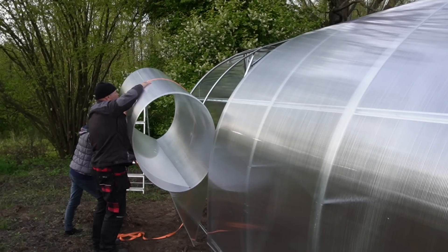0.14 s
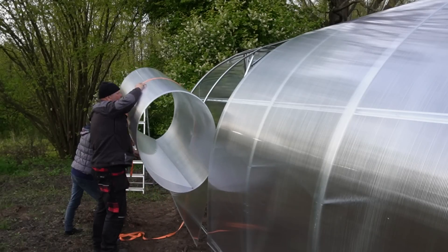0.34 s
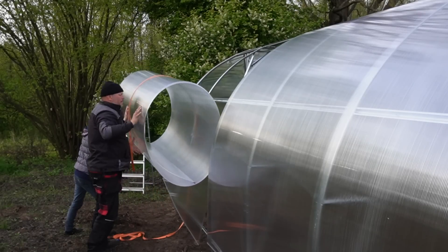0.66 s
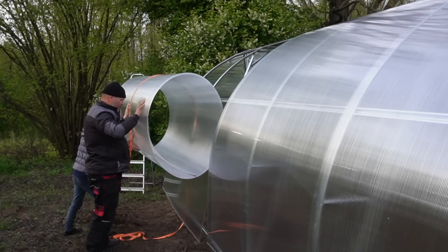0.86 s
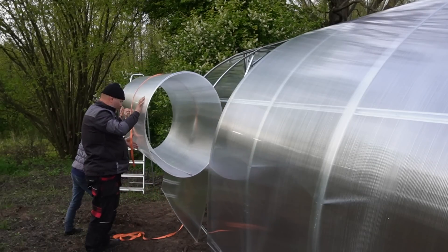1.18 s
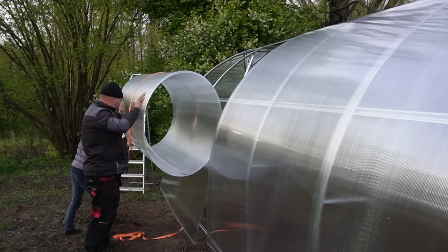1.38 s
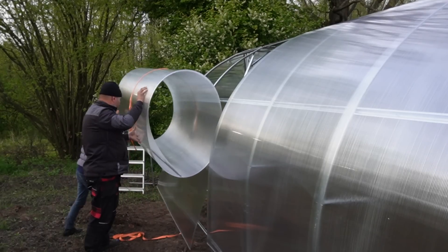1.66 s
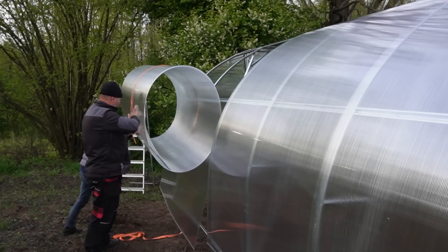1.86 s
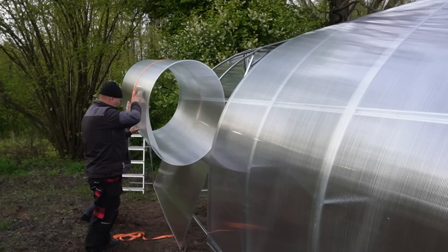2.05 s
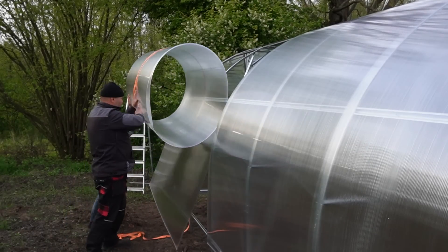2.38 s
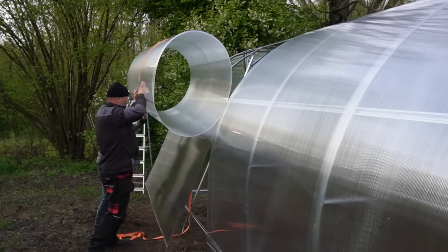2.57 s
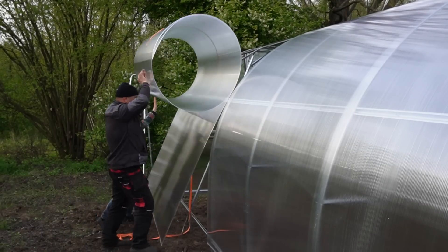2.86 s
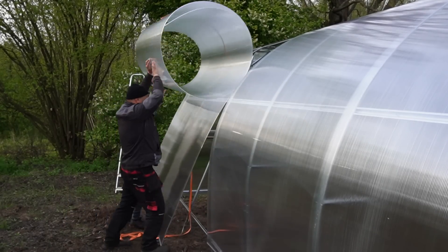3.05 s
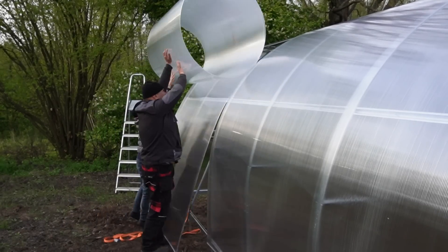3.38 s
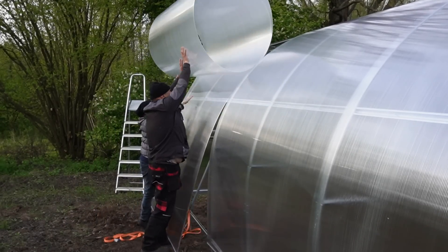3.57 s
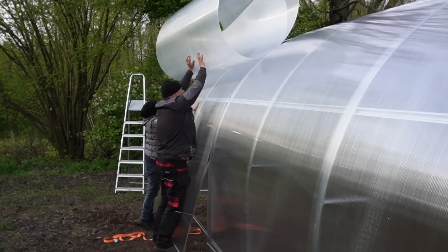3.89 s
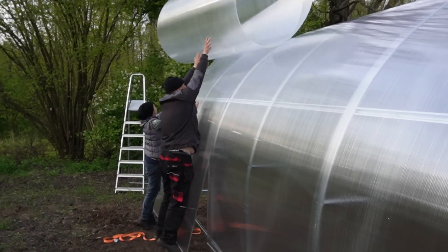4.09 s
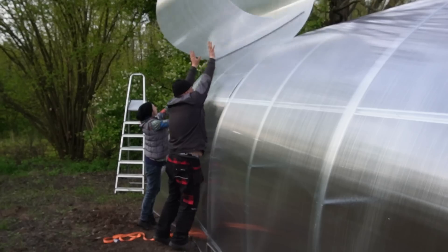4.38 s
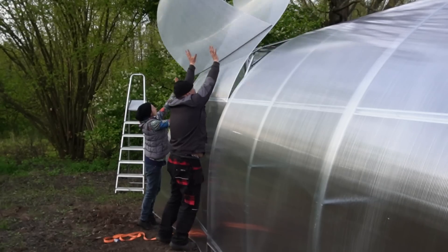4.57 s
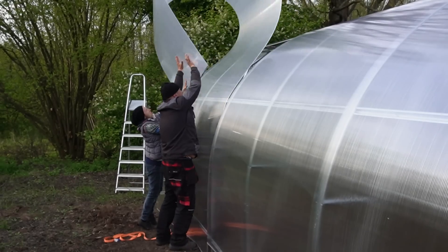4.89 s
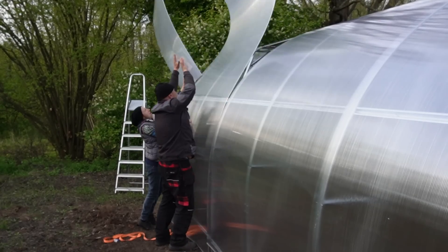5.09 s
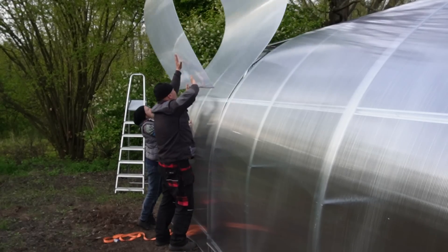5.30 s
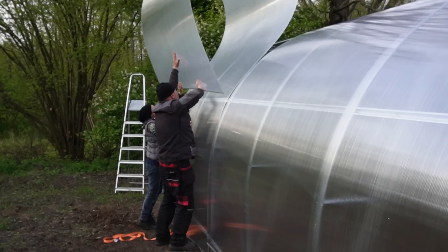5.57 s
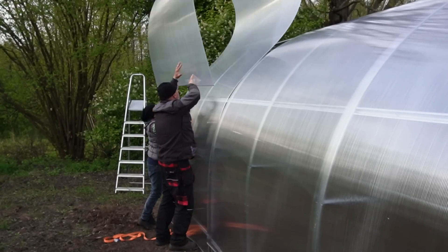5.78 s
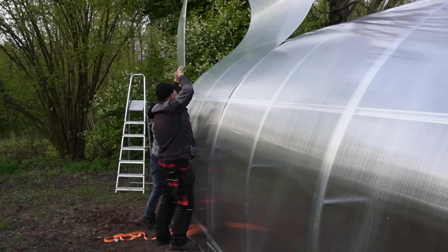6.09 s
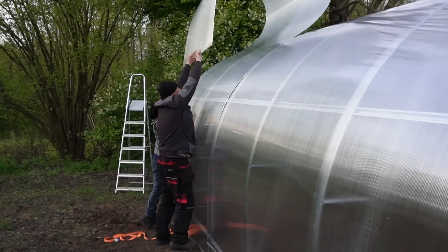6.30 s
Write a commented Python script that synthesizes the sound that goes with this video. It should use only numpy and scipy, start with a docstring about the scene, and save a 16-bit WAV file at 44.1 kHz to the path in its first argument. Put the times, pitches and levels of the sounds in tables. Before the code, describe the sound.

Outdoors, a little way from the microphone, a hollow plastic panel crackles and pops as it is bent, the sounds quick and clipped. The snaps give way to swishing slides, then a loud, brief squeak as the sheet rubs on the frame. After a couple more cracks the panel flexes with dull booms and thumps, growing much quieter, with scattered ticks over very faint garden air.

```python
"""Plastic sheet rolled over a greenhouse frame

Two people handle a stiff hollow sheet outdoors, some metres away. It buckles in snaps over a rustle,
booms and thumps as it wobbles, chirps and squeaks on the frame. A faint hum stands in the garden air.
The scene runs sped up: time skips ahead every 40 ms, cutting rings short."""
import sys
import numpy as np
from scipy import signal
from scipy.io import wavfile
from scipy.ndimage import uniform_filter1d

SR = 44100
rng = np.random.default_rng(int(sys.argv[2]) if len(sys.argv) > 2 else 0)


def persist_wave(psi):
    """Save psi, clipped to +-1, as 16-bit WAV."""
    counts = np.round(np.clip(psi, -1, 1) * 32767).astype(np.int16)
    wavfile.write(sys.argv[1], SR, np.atleast_2d(counts).T)


N = 284445
PIECE_S, FIRST_SKIP_S = 0.04, 0.032

# buckling snaps: t/s, crack level/dB, body level/dB, ring t60/s
SNAPS = [(0.0487, -36, -35, 0.2), (0.147, -32, -31.5, 0.29), (0.3058, -22, -20.5, 0.24),
         (0.607, -15, -13.5, 0.17), (0.634, -23.5, -31, 0.27), (0.6867, -27, -32, 0.1),
         (0.7865, -25.5, -30.5, 0.63), (0.826, -22, -10, 0.058), (0.942, -22, -16.5, 0.29),
         (0.953, -16, -10.5, 0.16), (1.033, -15.5, -12.5, 0.23), (1.065, -15.5, -15, 0.39),
         (1.082, -26, -18, 0.26), (1.1072, -20, -36, 0.2), (1.126, -26, -16, 0.073),
         (1.2021, -16, -20.5, 0.16), (1.235, -27.5, -30, 0.44), (1.3054, -21.5, -22.5, 0.46),
         (1.3229, -19, -15.5, 0.39), (1.474, -33, -16.5, 0.21), (1.51, -21, -14, 0.11),
         (1.539, -8, -10, 0.27), (1.9091, -22.5, -21, 1), (1.974, -15.5, -20, 0.31),
         (1.991, -22, -13, 0.37), (2.03, -13.5, -17, 0.23), (2.0543, -11.5, -19, 0.33),
         (2.1175, -14.5, -21, 0.16), (2.1887, -13, -18, 0.19), (2.216, -22.5, -19.5, 0.86),
         (2.2836, -20, -10.5, 0.087), (2.4061, -27, -36, 1), (3.5235, -28, -31.5, 0.37),
         (3.6505, -23, -24, 0.4), (3.863, -14, -18, 0.22), (3.87, -13, -16.5, 0.12),
         (4.1128, -29, -32.5, 0.17), (4.225, -29, -29.5, 0.31), (4.4034, -48, -32.5, 0.88),
         (4.717, -35, -33.5, 0.096), (4.775, -33, -53, 0.5), (4.9335, -38.5, -33, 0.19),
         (5.159, -43.5, -31.5, 0.24), (6.32, -43.5, -42.5, 0.23)]
# panel flips, booming until held again: t/s, length/s, level/dB
BOOMS = [(1.313, .4, -50), (3.067, .08, -30), (3.877, .04, -26.5), (4.23, .16, -35.5), (4.392, .28, -30.5),
         (4.712, .2, -34.5), (4.91, .24, -36.5), (6.3, .12, -42.5)]


def amp(db):
    return 10 ** (np.asarray(db) / 20)


def unit_rms(x):
    return x / np.sqrt(np.mean(x ** 2) + 1e-20)


def colour(x, points):
    """Minimum-phase filter through points of f/Hz, gain/dB."""
    f, db = np.transpose(points)
    hz = abs(np.fft.fftfreq(4096, 1 / SR))
    log_gain = np.log(amp(np.maximum(np.interp(np.log(hz + 1), np.log(f), db), -100)))
    taps = np.fft.ifft(np.exp(np.conj(signal.hilbert(log_gain)))).real
    return signal.oaconvolve(x, taps[:2048])[:len(x)]


def ring(x, modes):
    """Sum of two-pole resonances: f/Hz, width/Hz, gain/dB."""
    return sum(amp(db) * signal.lfilter(*signal.iirpeak(hz, hz / width, SR), x)
               for hz, width, db in modes)


def shaped(envelope, drive, shape):
    """Enveloped drive through a filter scaled to keep the envelope's level."""
    return shape(envelope * drive) / np.std(shape(drive))


def skips(t):
    """Count of time skips up to t."""
    return np.floor((t - FIRST_SKIP_S) / PIECE_S).astype(int) + 1


def skipping_noise(shape, speed=1):
    """Filtered unit noise, read at a given speed, jumping one piece ahead at each skip."""
    position = np.cumsum(speed * np.ones(N)) + skips(np.arange(N) / SR) * round(PIECE_S * SR)
    return unit_rms(np.interp(position, np.arange(3 * N), shape(rng.standard_normal(3 * N))))


def air():
    """Garden air at unit level."""
    # air spectrum: f/Hz, density/dB
    spectrum = [(25, -2.5), (407, -8), (620, 2), (874, -19), (7970, -20.5), (10900, -25), (13500, -39)]
    return skipping_noise(lambda x: colour(x, spectrum))


def hum(hz=626, level_db=-63.5):
    """Faint tone; phase and level jump at each skip."""
    t = np.arange(N) / SR
    tone = np.sqrt(2) * np.sin(2 * np.pi * (hz * t + rng.random(200)[skips(t)]))
    return tone * amp(level_db + 1.7 * rng.standard_normal(200)[skips(t)])


def handling(jump_share=0.8, boom_fade_db_per_s=32):
    """Rustle, hiss and wobble gains: strokes and booms over steady handling, stepping at each skip."""
    # steady handling: t/s, rustle/dB, hiss/dB, wobble/dB
    steady = [(0.0, -46, -51, -58), (0.3, -49.5, -49, -68), (0.6, -46, -44.5, -54.5), (1.3, -43, -44, -59),
              (1.8, -40.5, -42, -63), (2.4, -50, -38, -51), (2.65, -50, -51.5, -59.5),
              (3.1, -43, -45.5, -49), (3.548, -47, -48.5, -49), (4.1, -45.5, -50, -44.5),
              (4.69, -58, -50.5, -50), (5.2, -47, -67.5, -38.5), (5.3, -63, -68, -46),
              (5.7, -66, -70.5, -59.5), (6.45, -62.5, -66, -63)]
    # sheet sliding on sheet or frame: t/s, length/s, rustle/dB, hiss/dB
    strokes = [(1.326, 0.39, -30.5, -32), (1.88, 0.22, -34, -35.5), (2.188, 0.092, -37, -32.5),
               (2.412, 0.066, -29, -36.5), (2.519, 0.078, -42, -36.5), (2.72, 0.075, -33.5, -37),
               (2.879, 0.092, -37, -40.5), (3.028, 0.05, -36.5, -36), (3.222, 0.28, -34, -51),
               (3.633, 0.11, -34.5, -43), (3.755, .24, -38, -38.5), (4.239, 0.42, -44.5, -47.5),
               (4.389, 0.048, -29, -53), (4.812, 0.3, -47.5, -76), (5.793, 0.26, -84, -67.5),
               (6.33, 0.094, -45.5, -60.5)]
    piece = skips(np.arange(N) / SR)
    t = FIRST_SKIP_S + PIECE_S * (np.arange(piece[-1] + 1) - .5)  # piece centres
    steady_s, *steady_db = np.transpose(steady)
    rub, hiss, flex = (amp(2 * np.interp(t, steady_s, db)) for db in steady_db)  # powers
    start_s, length_s, rub_db, hiss_db = np.transpose(strokes)
    from_s = np.maximum(start_s, t[:, None] - PIECE_S / 2)
    to_s = np.minimum(start_s + length_s, t[:, None] + PIECE_S / 2)
    overlap = np.clip((to_s - from_s) / PIECE_S, 0, 1)
    rub += overlap @ amp(2 * rub_db)
    hiss += overlap @ amp(2 * hiss_db)
    flip_s, free_s, boom_db = np.transpose(BOOMS)
    age_s = t[:, None] - flip_s
    booming = (age_s > 0) * (age_s < free_s)
    flex += (booming * amp(2 * (boom_db - boom_fade_db_per_s * age_s.clip(0)))).sum(1)
    gains = []
    for power in rub, hiss, flex:
        db = (10 * np.log10(power) + 1.2 * rng.standard_normal(200)[:len(t)])[piece]
        stepped_db, smooth_db = uniform_filter1d(db, 60), uniform_filter1d(db, 2400)
        gains.append(amp(jump_share * stepped_db + (1 - jump_share) * smooth_db))
    return gains


def chirps():
    """Sheet sliding on the frame: brief noise in one narrow resonance."""
    # slides: t/s, length/s, f/Hz, level/dB
    slides = [(3.662, 0.043, 1584, -29.5), (3.851, 0.028, 2100, -31.5), (3.955, 0.031, 1234, -32.5),
              (4.104, 0.067, 906, -42), (5.09, 0.033, 3410, -47)]
    out = np.zeros(N)
    for s, length_s, hz, db in slides:
        band = ring(rng.standard_normal(6000), [(hz, 0.027 * hz, 0)])
        tone = unit_rms(band[2000:][:round(length_s * SR)])
        out[round(s * SR):][:len(tone)] += amp(db) * tone * signal.windows.tukey(len(tone), .5)
    return out


def wobble(flex, taut_ratio=1.15, slacken_per_s=1.6):
    """The flexing panel booms; its modes start high at each flip and sink."""
    # slow bending modes: f/Hz, width/Hz, gain/dB
    modes = [(72.6, 42, 3), (154, 140, 2.5), (218, 90, 1), (400, 50, -8)]
    t, flip_s = np.arange(N) / SR, np.transpose(BOOMS)[0]
    age_s = t - flip_s[np.maximum(np.searchsorted(flip_s, t) - 1, 0)]
    pitch_ratio = taut_ratio * np.exp(-slacken_per_s * age_s.clip(0, .3))
    return flex * skipping_noise(lambda x: ring(ring(x, modes), modes), pitch_ratio)


def thumps(rise_s=0.0099, t60_s=0.4, sag_per_s=4.37):
    """A soft push on the panel: one low note that sags as it dies."""
    # panel thumps: t/s, f/Hz, level/dB
    pushes = [(4.435, 187.5, -24), (4.719, 258, -29), (4.785, 202.3, -26), (6.016, 252, -48),
              (6.181, 247, -43.5)]
    t, out = np.arange(SR // 4) / SR, np.zeros(N + SR)
    for s, hz, db in pushes:
        note = np.sin(2 * np.pi * np.cumsum(hz * np.exp(-sag_per_s * t)) / SR)
        out[round(s * SR):][:len(t)] += amp(db - 60 * t / t60_s) * (1 - np.exp(-t / rise_s)) * note
    return out[:N]


def creases(hiss, rate_per_s=130, t60_s=0.014):
    """Tiny creases, each a broad tick with a high ping; most are random and scale with the hiss."""
    # loudest creases: t/s, level/dB
    loudest = [(.217, -30), (1.796, -21), (2.432, -21), (2.501, -36), (2.54, -29), (4.486, -24.5),
               (4.726, -30), (4.741, -28.5), (4.767, -29), (4.802, -28.5)]
    # tick pitches (the ring near 8.4 kHz is probably the microphone's): f/Hz
    pings_hz = [4200, 6600, 8350, 8700]
    hits = hiss * (rng.random(N) < rate_per_s / SR)
    hits *= amp(1.5 + 2.9 * np.minimum(rng.exponential(1, N), 3))
    for s, db in loudest:
        hits[round(s * SR)] = amp(db)
    which = rng.integers(0, len(pings_hz), N)
    t, out = np.arange(400) / SR, np.zeros(N)
    for k, hz in enumerate(pings_hz):
        burst = amp(-60 * t / t60_s) * rng.standard_normal(len(t))
        tick = 0.13 * np.diff(burst) + 2.3 * ring(burst, [(hz, 1500, 0)])[1:]
        out += signal.oaconvolve(hits * (which == k), tick)[:N]
    return out


def squeak(end_s=3.672, release_db_per_s=150):
    """Stick-slip on the frame: ten wavering harmonics and a rasp, gliding between time skips."""
    # squeak track: t/s, f/Hz, fundamental/dB, octave/dB, upper partials/dB, rasp/dB
    track = [(3.192, 833.6, -21.5, -20.5, -34, -35.5), (3.245, 833.3, -14.5, -17, -27.5, -25),
             (3.29, 829.7, -14.5, -29, -24.5, -30.5), (3.325, 843.7, -9, -25.5, -28, -25.5),
             (3.365, 835.5, -12.5, -19, -24.5, -21), (3.402, 825.3, -11, -26, -38.5, -28.5),
             (3.422, 828, -20.5, -27, -40.5, -32.5), (3.455, 839, -13.5, -37, -39.5, -35),
             (3.472, 826, -30.5, -39, -45.5, -46)]
    # time skips where the squeak's level steps: t/s
    level_skips_s = [3.232, 3.472]
    clicks_s = [3.232, 3.312, 3.352, 3.392, 3.472]  # phase jumps at time skips
    row_s, *columns = np.transpose(track)
    t = np.arange(row_s[0], end_s, 1 / SR)
    part = np.searchsorted(level_skips_s, t, "right")
    row_part = np.searchsorted(level_skips_s, row_s + .002)
    hz, first_db, octave_db, upper_db, rasp_db = (
        np.choose(part, [np.interp(t, row_s[row_part == p], column[row_part == p]) for p in range(3)])
        for column in columns)
    turns = np.cumsum(hz) / SR + 0.407 * uniform_filter1d(1. * np.searchsorted(clicks_s, t), 20)
    partials_db = [first_db, octave_db, upper_db + 1.8] + [upper_db - 4.6 * k for k in range(7)]
    drift = uniform_filter1d(uniform_filter1d(rng.standard_normal((2, 10, len(t))), 300), 300)
    tone = np.zeros(len(t))
    for k, db in enumerate(partials_db):
        loose = min(0.06 + 0.16 * k, 0.75)  # higher partials waver more
        waver = (unit_rms(drift[0, k]) + 1j * unit_rms(drift[1, k])) / np.sqrt(2)
        phasor = np.exp(2j * np.pi * ((k + 1) * turns + rng.random()))
        tone += amp(db) * ((np.sqrt(1 - loose ** 2) + loose * waver) * phasor).real
    grit = [(3130, 4300, 0)]
    rasp = amp(rasp_db) * unit_rms(ring(ring(rng.standard_normal(len(t)), grit), grit))
    release = amp(-release_db_per_s * (t - level_skips_s[-1]).clip(0))
    out = np.zeros(N)
    out[round(row_s[0] * SR):][:len(t)] = (np.sqrt(2) * tone + rasp) * release
    return out


def crackle(rate_per_s, spread_db, t60_s, floor):
    """Noise that leaps at random tiny slips and decays after each."""
    slips = (rng.random(N) < rate_per_s / SR) * amp(spread_db * np.minimum(rng.exponential(1, N), 4))
    strength = signal.lfilter([1], [1, -amp(-60 / (t60_s * SR))], slips)
    return unit_rms((floor + unit_rms(strength)) * rng.standard_normal(N))


def patchy(x, depth_db):
    """Each moment excites another part of the sheet: the colour drifts in patches."""
    spectrum = signal.stft(x, nperseg=256)[2]
    noise = rng.standard_normal(spectrum.shape)
    patches = unit_rms(uniform_filter1d(uniform_filter1d(noise, 3, axis=0), 9, axis=1))
    return signal.istft(spectrum * amp(depth_db * patches), nperseg=256)[1][:N]


def snap_envelope(levels_db, t60_s, rise_s, delay_s=0, skip_age_s=0.016):
    """Power sum of a quick rise and exponential fall per snap; each skip ages the ring."""
    t, power = np.arange(SR // 2) / SR, np.zeros(N + SR)
    for s, db, ring_s in np.broadcast(np.transpose(SNAPS)[0], levels_db, t60_s):
        age_s = t + skip_age_s * np.maximum(skips(s + t) - skips(s + 0.0057), 0)
        envelope = amp(db - 60 * age_s / max(ring_s, .005)) * (1 - np.exp(-t / rise_s))
        power[round((s + delay_s) * SR):][:len(t)] += envelope ** 2
    return np.sqrt(power[:N])


def sheet(rub, hiss):
    """Rubbing rustles and hisses; buckling gives a click and crack, a knock and a duller ring."""
    # spectra of rubbed sheet, surface hiss, snap front and struck sheet: f/Hz, density/dB
    rustle_eq = [(70, -46), (130, -6), (340, -1), (1200, -4.5), (2500, -8.5), (4500, -15.5), (7000, -38)]
    hiss_eq = [(4000, -6), (6500, -11), (8400, -6.5), (10000, -11.5), (12500, -14.5), (15500, -48)]
    crack_eq = [(500, -33), (1500, 1.5), (3500, 8), (8400, 8.5), (11000, -0.5), (15500, -24)]
    knock_eq = [(100, -29), (190, -1), (340, -3), (1300, 0), (2500, -5), (4500, -11.5), (7000, -36.5)]
    # hollow-sheet resonances: f/Hz, width/Hz, gain/dB
    cells = [(333.7, 37, 1.5), (682, 18, -5.5)]
    _, crack_db, body_db, t60_s = np.transpose(SNAPS)
    rustle = shaped(rub, crackle(370, 1.9, 0.12, floor=0.17), lambda x: colour(x, rustle_eq))

    tail = snap_envelope(body_db - 1.5, t60_s, rise_s=0.0043)
    punch = snap_envelope(body_db - 9, 0.21 * t60_s, rise_s=0.00093)
    impact = snap_envelope(body_db - 0.5, 0.007, rise_s=0.00018, delay_s=0.002)
    push = np.sqrt(tail ** 2 + punch ** 2 + impact ** 2)
    shiver = crackle(500, 2.5, 0.03, floor=0.9)
    knock = shaped(push, shiver, lambda x: colour(x + 1.66 * ring(x, cells), knock_eq))

    scrape = np.hypot(hiss, snap_envelope(crack_db - 11.5, 0.64 * t60_s, rise_s=0.0031))
    fizz = shaped(scrape, crackle(210, 0.72, 0.048, floor=1), lambda x: colour(x, hiss_eq))

    click = snap_envelope(crack_db + 5, 0.005, rise_s=0.0001, delay_s=0.0015)
    front = np.hypot(snap_envelope(crack_db - 9.5, 0.45 * t60_s, rise_s=0.0008), click)
    crack = shaped(front, rng.choice([-1., 1.], N), lambda x: colour(x, crack_eq))
    return rustle + knock + fizz + crack


def scene():
    """Close-set microphones differ by shifting scattered reflections; the squeak sits slightly right."""
    # stereo width: f/Hz, side gain/dB
    width = [(60, -35), (200, -43), (600, -26.5), (2000, -12.5), (8000, -10.5), (15000, -5.5)]
    rub, hiss, flex = handling()
    centre = patchy(sheet(rub, hiss), depth_db=1.68) + creases(hiss) + wobble(flex) + thumps() + chirps()
    centre += hum() + amp(-61.5) * air()
    squeal = squeak()
    spectrum = signal.stft(centre + 0.45 * squeal, nperseg=256)[2]
    random_phase = np.exp(2j * np.pi * rng.random(spectrum.shape))
    scattered = signal.istft(spectrum * random_phase, nperseg=256)[1][:N]
    mid = centre + squeal
    side = colour(scattered, width) - 0.09 * squeal + amp(-68) * air()
    return np.array([mid + side, mid - side])


def record(dry):
    """The input stage rounds off the highest peaks; then the band limit."""
    edge_hz = 15650
    lowpass = signal.firwin(511, edge_hz, window=("kaiser", 9), fs=SR)
    return signal.oaconvolve(np.tanh(dry), lowpass[None], "same")


dry = scene()
out = record(dry)
persist_wave(out)
```